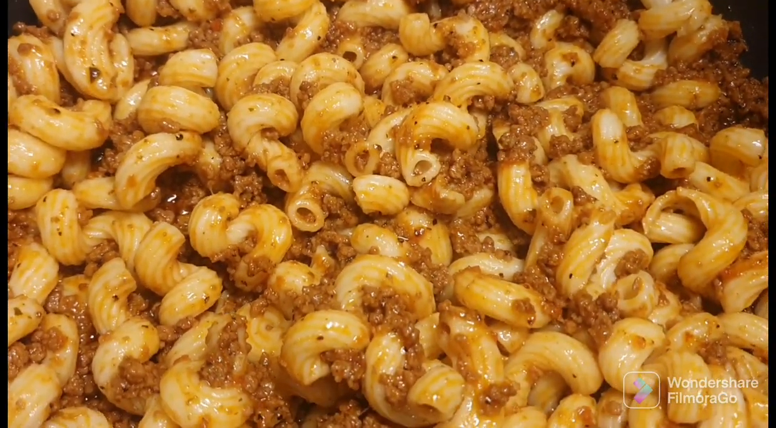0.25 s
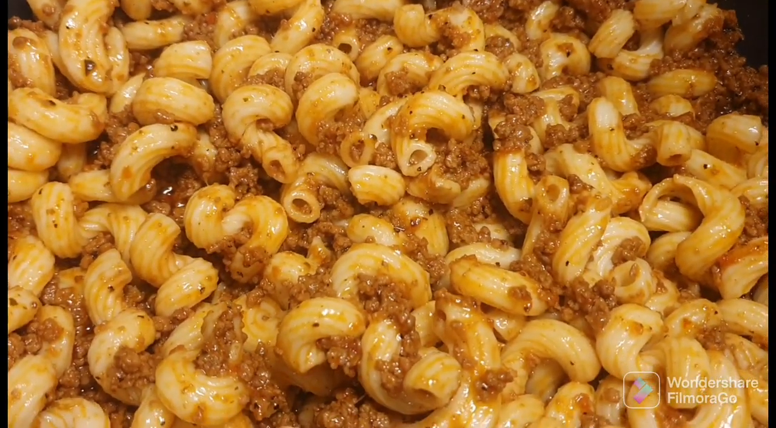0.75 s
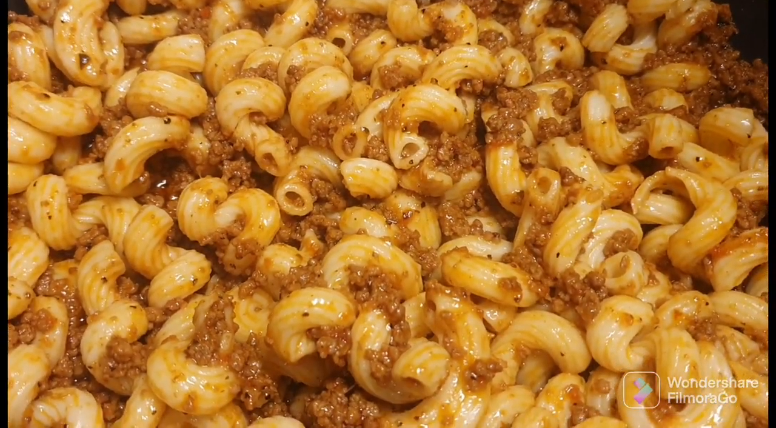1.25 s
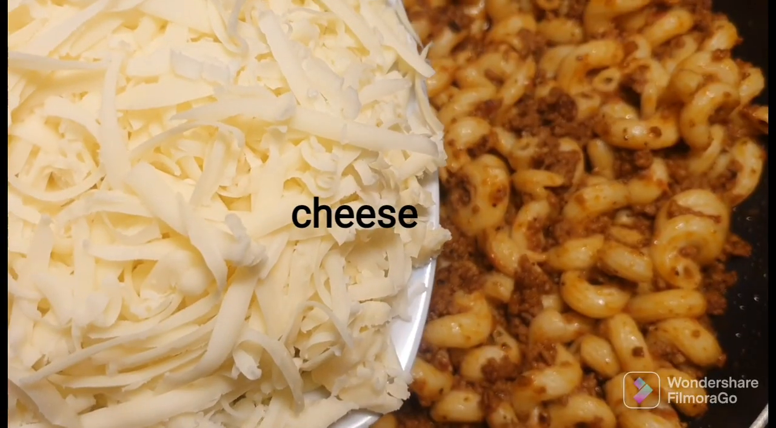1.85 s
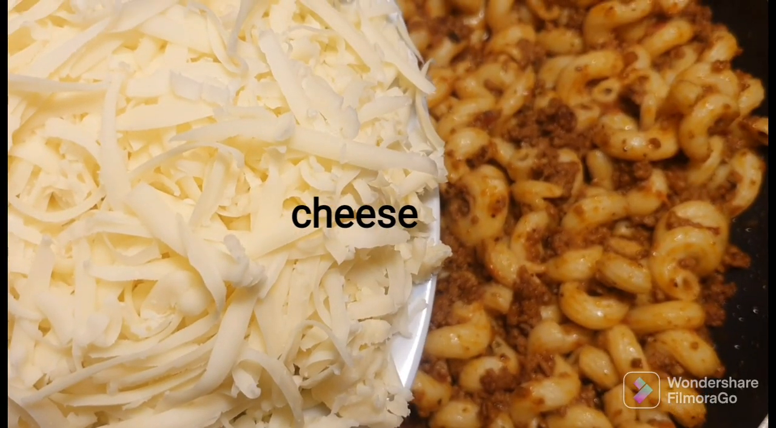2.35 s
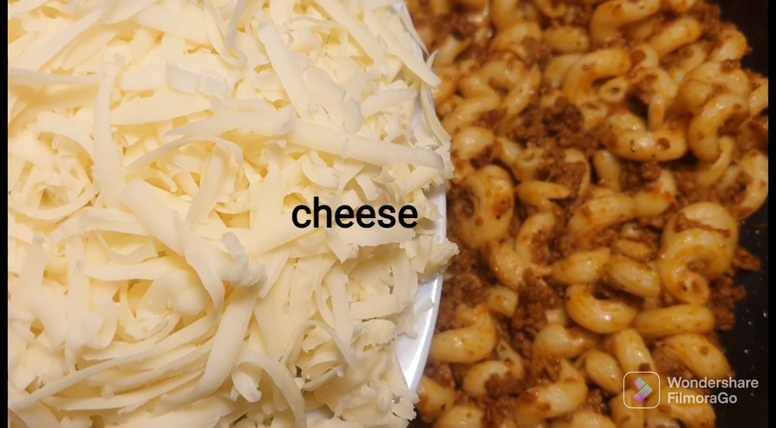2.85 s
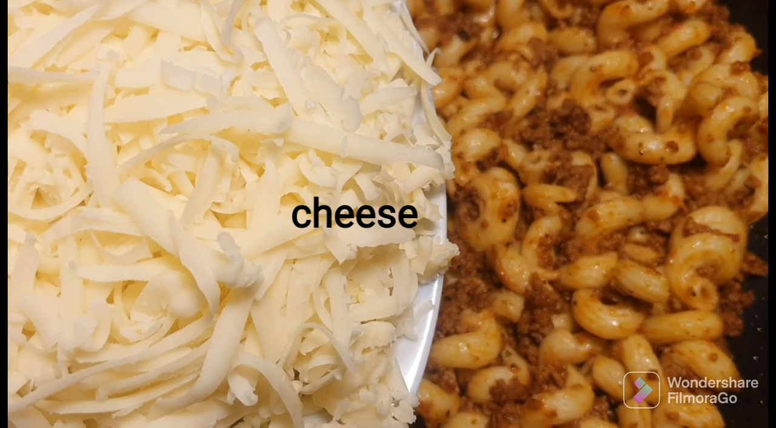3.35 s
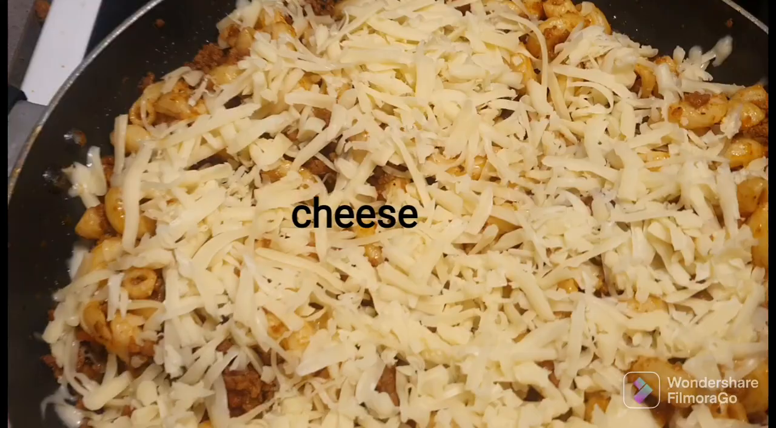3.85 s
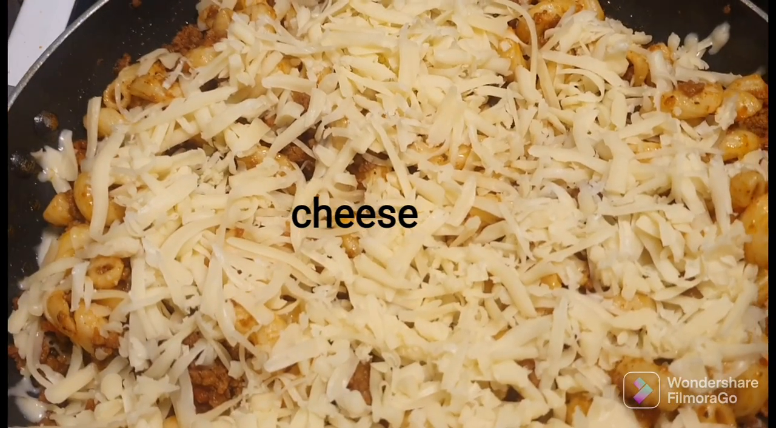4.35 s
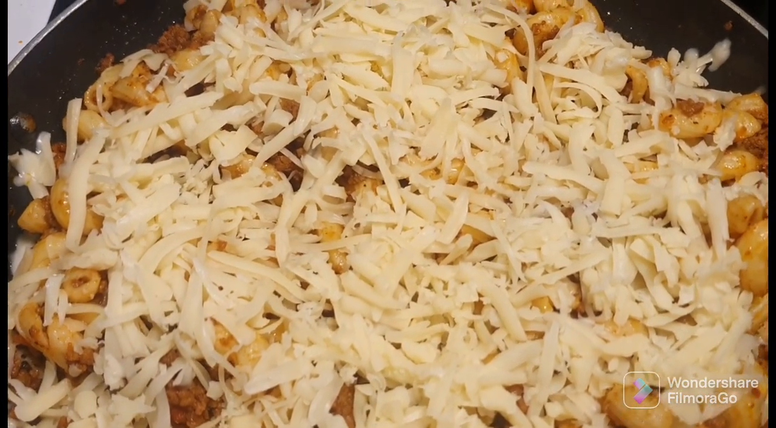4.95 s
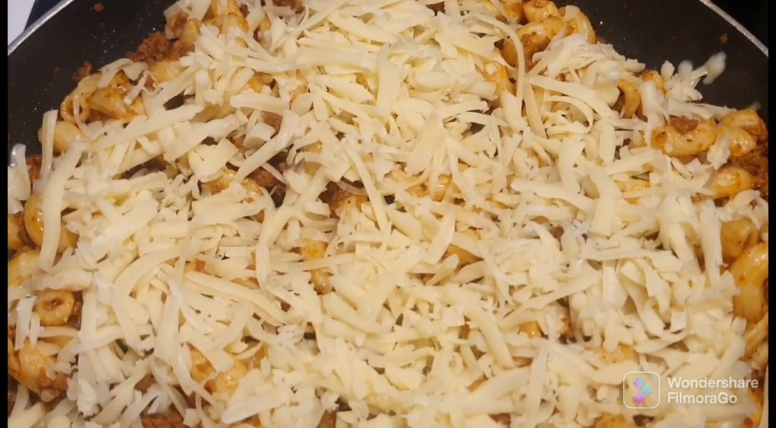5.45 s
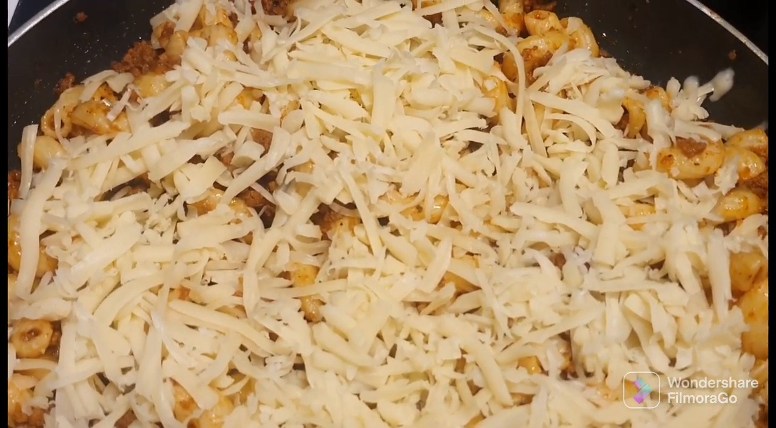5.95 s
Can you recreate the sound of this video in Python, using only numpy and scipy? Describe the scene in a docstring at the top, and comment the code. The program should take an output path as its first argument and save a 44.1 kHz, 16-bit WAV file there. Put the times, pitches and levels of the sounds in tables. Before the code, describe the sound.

Stereo, roomy pickup inside a kitchen with birds outdoors. Reverberant, falling sparrow chirps recur throughout. A blackbird whistles low, burry, gliding notes with short pauses, then a squeaky twitter, and falls silent. Meanwhile cookware is knocked and set down with short, muffled, hollow clunks, plus a couple of light ticks. Soft far hoots pass almost unnoticed midway; a faint regular low throb and gentle room noise continue.

```python
"""Birdsong heard from a quiet kitchen

A blackbird sings one fluting phrase that ends in a thin twitter, while a sparrow chirps on: gliding
near-sine tones, roughened in pitch and loudness, with delayed copies and decaying noise as echoes.
Kitchenware is bumped and set down a little way off: damped modes and a noise thud, with a few light ticks.
Beneath lie room rumble and the haze of far birds (shaped noise), mains hum (a sine) and a faint, regular
sub-bass throb (Gaussian pulses). A few soft, far hoots come late."""
import sys
import numpy as np
from scipy import signal
from scipy.fft import rfft, irfft, next_fast_len
from scipy.io import wavfile
from scipy.ndimage import uniform_filter1d, map_coordinates

SR = 44100
rng = np.random.default_rng(int(sys.argv[2]) if len(sys.argv) > 2 else 0)


def wrap_up_sound(samples):
    """Save the sound to the file named by the first command line argument, as 16-bit audio."""
    columns = np.atleast_2d(samples).T
    # keep every value between -1 and 1, then stretch to whole-number steps
    tamed = np.clip(columns, -1, 1)
    steps = np.round(tamed * 32767).astype(np.int16)
    wavfile.write(sys.argv[1], SR, steps)


N = 272979
T = np.arange(N) / SR

# Spectral shape of the room rumble and hiss: f/Hz, relative density/dB
ROOM_SPECTRUM = [(20, -2.5), (45, -3), (75, -1), (125, -3), (160, -5.5), (225, -3.5), (400, -10.5),
                 (520, -9), (700, -13), (950, -13), (1300, -19), (1900, -28), (5000, -34.5), (8000, -42.5),
                 (15500, -60.5)]
# Correlation between the ears of diffuse noise: f/Hz, correlation/1
EAR_CORRELATION = [(60, 0.65), (250, 0.72), (600, 0.21), (1500, 0.15), (4000, 0.21), (12000, 0.34)]
# Slow swell of the room noise: t/s, relative level/dB
ROOM_SWELL = [(0, -0.5), (1.1, -1), (1.6, 2), (3, 0.5), (4.2, 1.5), (5.1, 0.5), (6.19, 3)]
# Spectral shape of the haze of far birds: f/Hz, relative density/dB
HAZE_SPECTRUM = [(1500, -7.5), (2500, 5.5), (3400, 0.5), (4800, 2.5), (6500, -19), (10000, -47.5)]
# Course of the haze: t/s, level/dB
HAZE_LEVEL = [(0, -81), (.25, -66.5), (.7, -89), (1.2, -71), (2.6, -59), (3.2, -62), (3.9, -59.5),
              (4.9, -63), (5.3, -64), (5.85, -67), (6.19, -57.5)]

# Sparrow chirps: t/s, level/dB, pitch ratio/1
CHIRPS = [(0.348, -45.5, 1.01), (0.828, -55, 0.91), (1.358, -41, 0.95), (1.993, -40.5, 1.0),
          (2.479, -54.5, 0.75), (2.681, -53, 0.84), (2.79, -54, 1.07), (2.884, -41.5, 0.91),
          (3.519, -40, 0.99), (4.247, -42.5, .97), (4.751, -56, 0.98), (4.925, -57.5, 0.97),
          (5.423, -42, 0.88), (6.007, -41.5, 0.96)]
# The two sides of the syrinx in one chirp, a curve each: t after start/s, f before pitch ratio/Hz, level/dB
SYRINX_SIDES = [
    [(-.008, 5900, -26), (.008, 6014, -13), (.027, 5550, -10.5), (.034, 4907, -1.5), (.065, 4515, -7),
     (.1, 4156, -9.5), (.125, 3800, -14)],
    [(.01, 3600, -14.5), (.036, 4142, -3), (.062, 3650, -7.5), (.102, 3418, -1), (.125, 3050, -17)],
]
# Overtones at 2, 3, 4 times the sparrow's pitch: relative level/dB
SPARROW_OVERTONES = [-27, -45.5, -37]
# Reverberation of the birds between the walls: f/Hz, t60/s
YARD_T60 = [(500, 0.31), (2000, 0.94), (4000, 0.73), (8000, 0.8), (15000, 0.4)]

# The blackbird's four long slurs, a curve each: t/s, f/Hz, level/dB
OPENING = [(1.278, 1760, -44), (1.3, 1824, -44), (1.318, 1913, -32), (1.334, 1956, -27.5),
           (1.378, 1978, -34), (1.408, 1924, -27), (1.44, 1870, -38.5), (1.472, 1820, -35),
           (1.492, 1807, -38.5)]
ARCH = [(1.655, 1930, -40), (1.67, 2643, -42.5), (1.69, 2743, -38), (1.72, 2572, -31), (1.755, 2260, -38),
        (1.785, 2727, -49)]
DIP = [(2.03, 2572, -46.5), (2.11, 2524, -40), (2.17, 2388, -36.5), (2.21, 2065, -35), (2.25, 2485, -39),
       (2.29, 2607, -37), (2.32, 2554, -45)]
CLOSING = [(3.375, 2560, -46), (3.395, 2175, -35.5), (3.412, 1968, -31), (3.44, 1920, -40.5),
           (3.485, 1953, -30.5), (3.53, 1963, -37.5), (3.575, 1946, -49)]
# How each slur is sung: curve, roughness as a share of the pitch/1, loudness beats/(1/s)
SLURS = [(OPENING, .001, 0), (ARCH, 0.016, 0), (DIP, 0.0207, 60), (CLOSING, .021, 54)]
# Its short notes: t/s, length/s, start f/Hz, end f/Hz (before the bow), mid-note level/dB,
# roughness as a share of the pitch/1, loudness beats/(1/s), where a negative rate dips first
NOTES = [ (1.04, 0.075, 1760, 1630, -66.5, 0.017, 1), (1.11, 0.037, 1880, 2070, -58.5, .014, -4),
         (1.135, .12, 2085, 2068, -54.5, 0.0094, -0.5), (1.602, 0.029, 3050, 1900, -44, 0.021, 0),
         (1.869, 0.037, 2514, 3140, -48.5, 0.013, -2), (1.893, 0.055, 2078, 2048, -33, 0.0092, 2.5),
         (1.933, 0.021, 2086, 1704, -32.5, 0.029, 2), (2.381, 0.053, 2787, 2835, -50.5, 0.029, 1.5),
         (2.421, 0.023, 1890, 1910, -39.5, 0.031, 3), (2.439, 0.023, 1912, 1908, -28.5, 0.017, 0),
         (2.46, 0.017, 1914, 1906, -33.5, 0.039, 81), (2.48, 0.052, 1974, 1890, -29, 0.016, -4),
         (2.819, 0.04, 2690, 2753, -51.5, 0.013, -3), (2.855, 0.052, 1812, 1986, -40, 0.033, 3),
         (2.903, 0.039, 1997, 1840, -31, 0.019, -2.5), (3.303, 0.078, 1684, 1840, -50, 0.027, 2),
         (3.328, 0.062, 1970, 2670, -42, 0.064, 0.5)]
# Overtones at 2, 3, 4 .. times the blackbird's pitch, before clean notes are made purer: relative level/dB
BLACKBIRD_OVERTONES = [-42, -40.5, -43.5, -46.5, -63, -51]
# One thin, high whistle rich in overtones: t/s, f/Hz, level/dB
THIN_WHISTLE = [(2.55, 4880, -60.5), (2.58, 4720, -48), (2.625, 4620, -62)]
# Quick downward flicks of the closing twitter: t/s, mid-note level/dB
FLICKS = [(3.654, -45), (3.704, -45.5), (3.752, -50.5), (4.074, -47)]
# One long squeal that falls from high up: t/s, f/Hz, level/dB
SQUEAL = [(3.785, 8950, -74), (3.86, 7940, -69), (3.965, 7500, -62.5), (4.0, 6690, -50.5),
          (4.025, 4880, -51), (4.048, 3400, -59)]
# Walls that throw the song back: delay/s, left level/dB, right level/dB
WALLS = [(.031, -10.5, -11.5), (.058, -35.5, -34), (.094, -17, -12.5)]

# Kitchenware bumped and set down: t/s, level/dB, brightness/(dB per octave)
KNOCKS = [(1.461, -48, 3.5), (1.519, -28, 0), (1.552, -32.5, -2), (1.608, -42.5, 2), (1.734, -37, 2.5),
          (1.955, -43, -2), (2.038, -41, 4.5), (2.066, -36.5, -5.5), (2.135, -38, 3.5), (2.186, -40.5, 1),
          (2.463, -42.5, 0), (4.172, -42.5, -1.5), (4.601, -31.5, 0.5), (4.645, -27.5, -.5),
          (4.797, -51.5, 3), (5.565, -48, -0.5), (5.92, -45, 0), (5.955, -41.5, 1.5)]
# Modes of the kitchenware: f/Hz, relative level/dB, t60/s
WARE_MODES = [(215, -11, 0.64), (323.7, -0.5, 0.41), (363.8, 6.5, 0.2), (527, 2, 0.26), (556, -7, 0.41),
              (597, -3.5, 0.42), (726, 0.5, 0.24), (779, -10, 0.17), (784, -2, 0.38), (870, -2.5, 0.29),
              (1049, -2, 0.17), (1144, -3, 0.32), (1264, -11, 0.35), (1970, -23, .45), (3060, -26, 0.61),
              (3220, -18, 0.23)]
# Spectral shape of the thud: f/Hz, relative density/dB
THUD_SPECTRUM = [(60, -15.5), (150, -19), (260, -2.5), (500, 0.5), (900, -4), (1400, -3.5), (2200, -9.5),
                 (4000, -16.5), (6000, -28), (9000, -52.5), (15000, -55)]
# Decay of the thud as it fills the room: f/Hz, t60/s
THUD_T60 = [(200, 0.37), (700, 0.36), (2000, 0.51), (5000, 0.42), (12000, 0.34)]
# Correlation of the thud between the ears, partly out of step: f/Hz, correlation/1
KNOCK_CORRELATION = [(200, 0.46), (380, 0.58), (700, -.05), (1300, -0.51), (2400, -0.3), (4400, -0.056)]

# Faint far hoots: t/s, length/s, f before the bow/Hz, mid-note level/dB
HOOTS = [(3.07, 0.21, 536, -65.5), (3.48, .11, 531, -56.5), (3.63, 0.083, 518, -58),
         (3.82, 0.24, 1300, -70)]
# Light utensil ticks: t/s, level/dB, centre f/Hz, t60/s
TICKS = [(3.36, -50.5, 3290, 0.23), (4.219, -41, 2340, 0.14), (4.227, -52, 2550, 0.049),
         (4.241, -81, 3270, 0.014)]

ROOM_DB = -52
# A short note bows upward in pitch by this share and is loudest in its middle; its ends are softer
BOW_SHARE, NOTE_ENDS_DB = 0.015, -5.5
BEAT_DEPTH = 0.35  # share by which a beating note's amplitude swings
FLICK_S, FLICK_FROM_HZ, FLICK_TO_HZ = 0.0267, 3250, 2390
# Time constant of a middling knock's rise, and the extra level that halves it
RISE_S, MIDDLING_DB, RISE_HALVES_DB = 0.0056, -41, 13.5
MODE_SPREAD_DB = 2.5  # standard deviation of a mode's strength from blow to blow
CUTOFF_HZ = 15700


def from_db(db):
    """Logarithmic levels: decibels to amplitude gain."""
    return 10 ** (np.asarray(db) / 20)


def rms_one(x):
    """Normalisation of mean power: scale to rms 1."""
    return x / np.sqrt(np.mean(x ** 2) + 1e-20)


def at_hz(points, hz):
    """Interpolation of a table on a logarithmic frequency axis."""
    f, value = np.transpose(points)
    return np.interp(np.log(hz + 1e-3), np.log(f), value)


def in_time(rows):
    """Linear interpolation of a (t/s, value) curve at every sample."""
    return np.interp(T, *np.transpose(rows))


def add(out, s, sound):
    """Superposition: mix a sound in from time s on."""
    i = max(int(s * SR), 0)
    out[..., i:i + sound.shape[-1]] += sound[..., :max(N - i, 0)]


def drift(rate, size):
    """Random modulation about 0: straight lines join normal draws of spread 1, rate of them per second."""
    knots = rng.standard_normal(2048)
    return map_coordinates(knots, [np.arange(size) / SR * rate], order=1, mode="mirror")


def colour(x, gain_at):
    """Linear filtering: multiply the spectrum by a gain that is a function of frequency."""
    size = next_fast_len(x.shape[-1])
    hz = np.arange(size // 2 + 1) * SR / size
    return irfft(rfft(x, size) * gain_at(hz), size)[..., :x.shape[-1]]


def stereo_noise(spectrum, size, correlation=EAR_CORRELATION):
    """Interaural correlation: the balance of mid and side noise sets it at each frequency; rms 1."""
    def shape(f, sign):
        balance = np.sqrt(1 + sign * np.clip(at_hz(correlation, f), -1, 1))
        return from_db(at_hz(spectrum, f)) * balance

    mid, side = rng.standard_normal((2, size))
    mid = colour(mid, lambda f: shape(f, 1))
    side = colour(side, lambda f: shape(f, -1))
    return rms_one(np.array([mid + side, mid - side]))


def die_away(noise, t60s):
    """Frequency-dependent absorption: each octave band decays exponentially at its own rate."""
    size = noise.shape[-1]
    centres = 250 * 2. ** np.arange(6)
    octave = np.log2(np.arange(1, size // 2 + 2) * SR / size)
    spectrum, out = rfft(noise), 0
    # overlapping triangular bands that sum to 1
    for hz, share in zip(centres, np.eye(len(centres))):
        band = irfft(spectrum * np.interp(octave, np.log2(centres), share), size)
        out = out + band * from_db(-60 * T[:size] / at_hz(t60s, hz))
    return out


def echo_tail(x, t60s, build_s):
    """Diffuse reverberation: convolution with unit-energy noise that builds up, then decays."""
    tail = die_away(rng.standard_normal((2, SR)), t60s)
    tail = tail * (1 - np.exp(-T[:SR] / build_s))
    return signal.fftconvolve(x[None], rms_one(tail) / np.sqrt(SR), axes=1)[:, :N]


def whistle(note, overtones, warble, warble_hz, rough):
    """Frequency modulation: a near-sine glides through (t/s, f/Hz, level/dB), shaken in pitch and loudness."""
    s, hz, db = np.transpose(note)
    t = s[0] + T[:max(int((s[-1] - s[0]) * SR), 256)]
    flutter = warble * np.sin(2 * np.pi * warble_hz * t + rng.uniform(0, 2 * np.pi))
    flutter = flutter + rough * drift(600, len(t))
    pitch = uniform_filter1d(np.interp(t, s, hz), size=200) * (1 + flutter)
    phase = 2 * np.pi * np.cumsum(pitch) / SR
    tone = np.sin(phase)
    for k, level in enumerate(overtones, 2):
        # random amplitude smears each hoarse overtone into a narrow band
        audible = k * pitch < SR / 2
        tone = tone + from_db(level) * drift(700, len(t)) * np.sin(k * phase) * audible
    burr = 1 + np.minimum(18 * rough, .55) * drift(172.6, len(t))
    edges = np.clip(np.minimum(t - t[0], t[-1] - t) / .004, 0, 1)  # 4 ms fades
    return np.sqrt(2) * tone * burr * edges * from_db(np.interp(t, s, db))


def short_note(s, length_s, start_hz, end_hz, db):
    """Parabolic contour: the (t/s, f/Hz, level/dB) points of a bowed glide that swells and fades."""
    u = np.linspace(0, 1, num=17)
    bow = 1 - (2 * u - 1) ** 2
    hz = (start_hz + (end_hz - start_hz) * u) * (1 + BOW_SHARE * bow)
    return np.transpose([s + length_s * u, hz, db + NOTE_ENDS_DB * (1 - bow)])


def background():
    """Superposed steady sources: shaped noise for room and far birds, a drifting sine for mains hum."""
    room_db = ROOM_DB + in_time(ROOM_SWELL) + 0.34 * drift(8.3, N)
    room = from_db(room_db) * stereo_noise(ROOM_SPECTRUM, N)
    hum = from_db(-60.5 + 3.6 * drift(9, N)) * np.sin(2 * np.pi * 100 * T)
    haze_db = in_time(HAZE_LEVEL) + 4.7 * drift(27, N)
    haze = from_db(haze_db) * stereo_noise(HAZE_SPECTRUM, N)
    return room + hum + haze


def throb(first_s, period_s, width_s, db):
    """Periodic pulse train: one-sided Gaussian bumps of sub-bass, less their mean value."""
    since = (T - first_s + period_s / 2) % period_s - period_s / 2
    bumps = np.exp(-.5 * (since / width_s) ** 2)
    return from_db(db) * (bumps - bumps.mean())


def sparrow():
    """Two-source phonation: both sides of the syrinx buzz and fall in pitch, heard mostly by reflection."""
    voice = np.zeros(N)
    for s, db, ratio in CHIRPS:
        for side in SYRINX_SIDES:
            note = np.array(side) * [1, ratio, 1]
            tone = whistle(note, SPARROW_OVERTONES, warble=0.083, warble_hz=227.9, rough=0.0519)
            add(voice, s + note[0, 0], from_db(db) * tone)
    near = echo_tail(voice, [(2000, 0.23), (8000, 0.1)], build_s=0.0068)
    yard = echo_tail(voice, YARD_T60, build_s=0.013)
    return from_db(-7.0) * voice + from_db(-6.0) * near + from_db(-7.0) * yard


def blackbird():
    """Discrete and diffuse reflection: fluted, burry notes from the left, a scattered twitter, wall echoes."""
    voice, twitter = np.zeros((2, N))
    short_notes = [(short_note(*row[:5]), *row[5:]) for row in NOTES]
    for note, rough, beats_per_s in SLURS + short_notes:
        # the cleaner the note, the weaker its overtones
        overtones = np.array(BLACKBIRD_OVERTONES) + np.interp(rough, [0, .015], [-9, 0])
        tone = whistle(note, overtones, warble=.5 * rough, warble_hz=83.9, rough=rough)
        beating = 1 + BEAT_DEPTH * np.sin(2 * np.pi * beats_per_s * T[:len(tone)])
        add(voice, note[0][0], tone * beating)
    thin = whistle(THIN_WHISTLE, [-12, -20], warble=.006, warble_hz=86.4, rough=.014)
    add(voice, THIN_WHISTLE[0][0], thin)

    flicks = [short_note(s, FLICK_S, FLICK_FROM_HZ, FLICK_TO_HZ, db) for s, db in FLICKS]
    for note in flicks + [SQUEAL]:
        add(twitter, note[0][0], whistle(note, [-27], warble=0.024, warble_hz=271, rough=0.043))

    direct = voice * from_db([[2.2], [-3.2]])  # left, right
    yard = from_db(-7.5) * echo_tail(voice + twitter, YARD_T60, build_s=0.01)
    # nearby surfaces blur the notes
    near = from_db(-13) * echo_tail(voice, [(2000, 0.17), (8000, 0.13)], build_s=.003)
    scattered = echo_tail(twitter, [(2000, 0.055), (8000, 0.19)], build_s=0.0011)
    out = direct + yard + near + from_db(-3.5) * twitter + scattered
    for delay, left_db, right_db in WALLS:
        add(out, delay, voice * from_db([[left_db], [right_db]]))
    return out


def kitchenware(ring_db, thud_db, apart_hz):
    """Modal excitation: each blow strikes every mode with its own strength, over a dull, diffuse thud."""
    out, t = np.zeros((2, N)), T[:SR // 2]
    hz, mode_db, t60 = np.transpose(WARE_MODES)
    decay = from_db(mode_db[:, None] - 60 * t / t60[:, None])
    modes = decay * np.exp(2j * np.pi * hz[:, None] * t)
    for s, db, tilt_db in KNOCKS:
        # a harder knock builds up faster
        rise_s = RISE_S * 2 ** ((MIDDLING_DB - db) / RISE_HALVES_DB)
        thud = die_away(stereo_noise(THUD_SPECTRUM, len(t), KNOCK_CORRELATION), THUD_T60)
        # long waves reach both ears in step, short ones do not; phases in turns
        turns = rng.random(len(hz)) + rng.standard_normal((2, len(hz))) * hz / apart_hz
        strengths = from_db(rng.normal(0, MODE_SPREAD_DB, len(hz))) * np.exp(2j * np.pi * turns)
        ring = (strengths @ modes).real
        knock = from_db(thud_db) * thud + from_db(ring_db) * ring
        # a harder contact is brighter: the tilt pivots at 700 Hz
        knock = colour(knock, lambda f: from_db(tilt_db * np.log2(np.clip(f, 200, 6000) / 700)))
        fade_out = np.minimum((t[-1] - t) * 10, 1)
        add(out, s, from_db(db) * knock * (1 - np.exp(-t / rise_s)) * fade_out)
    return out


def hoots():
    """Nearly pure tones: soft, clean, bowed notes from far away, without overtones."""
    voice = np.zeros(N)
    for s, length_s, hz, db in HOOTS:
        note = short_note(s, length_s, hz, hz, db)
        add(voice, s, whistle(note, [], warble=.002, warble_hz=16, rough=0.0075))
    return voice


def ticks():
    """Broadband impact: short, bright noise starts at once and decays exponentially."""
    out, t = np.zeros((2, N)), T[:SR // 4]
    for s, db, hz, t60 in TICKS:
        spectrum = [(hz / 8, -12), (hz, 0), (hz * 2, -11), (hz * 4, -28)]
        add(out, s, stereo_noise(spectrum, len(t)) * from_db(db - 60 * t / t60))
    return out


def scene():
    """Linear superposition: birds outside and kitchenware inside, over the background."""
    low = throb(first_s=0.1657, period_s=.256, width_s=0.01, db=-38.5)
    birds = sparrow() + blackbird() + hoots()
    indoors = kitchenware(ring_db=-8.0, thud_db=-0.5, apart_hz=2490) + ticks()
    return background() + low + birds + indoors


def record(dry):
    """Band limitation: an elliptic low-pass filter cuts the top steeply."""
    low_pass = signal.ellip(10, .1, 80, CUTOFF_HZ, fs=SR, output="sos")
    return signal.sosfilt(low_pass, dry)


dry = scene()
out = record(dry)
wrap_up_sound(out)
```